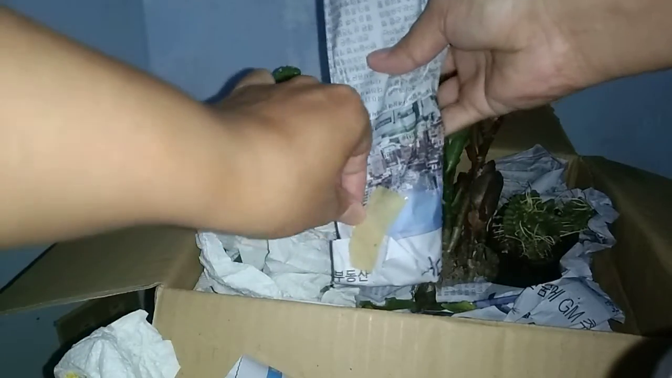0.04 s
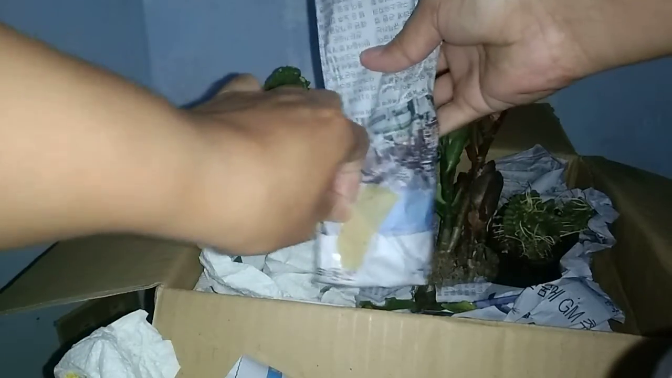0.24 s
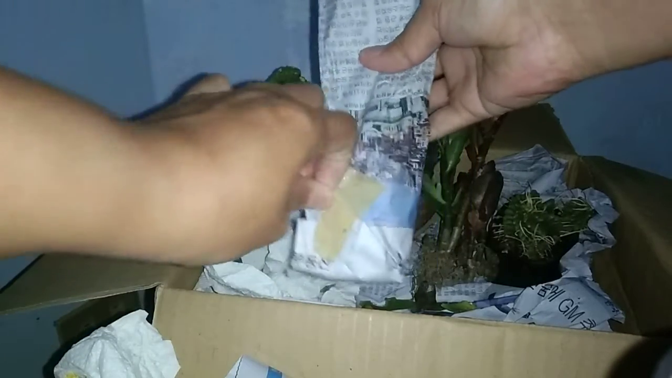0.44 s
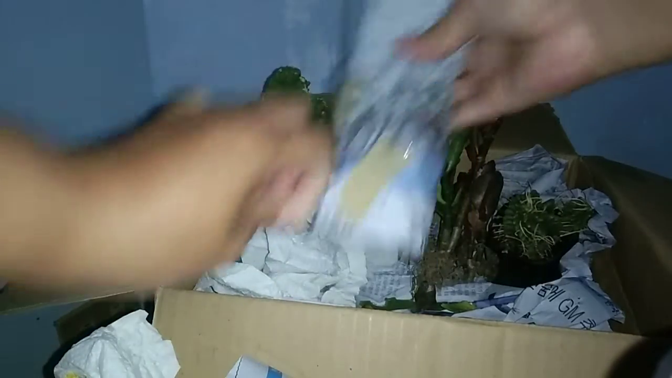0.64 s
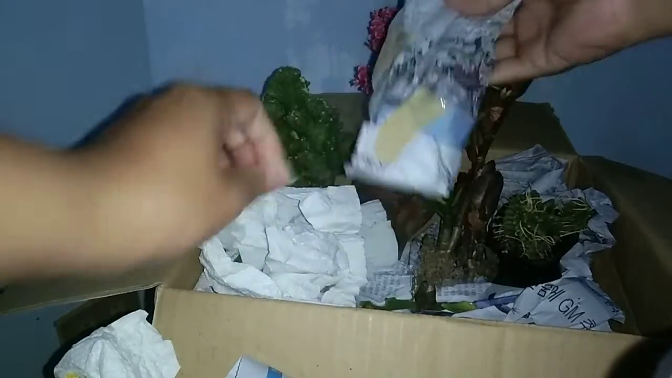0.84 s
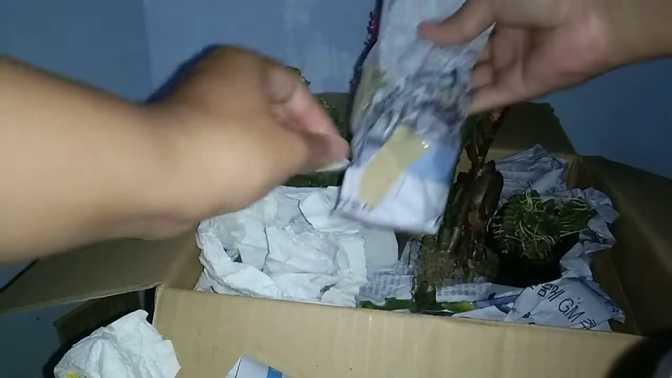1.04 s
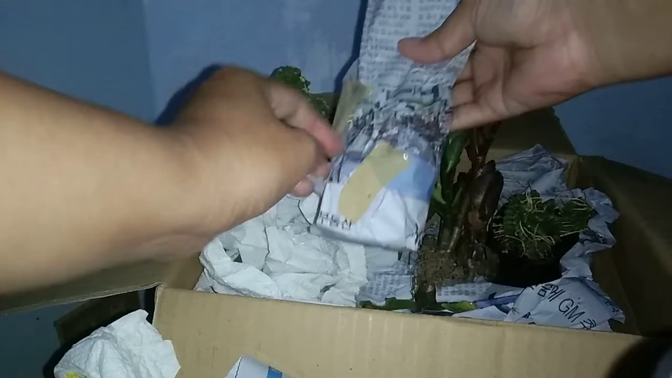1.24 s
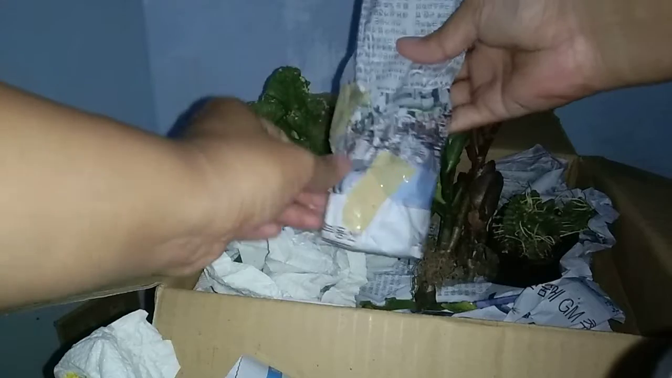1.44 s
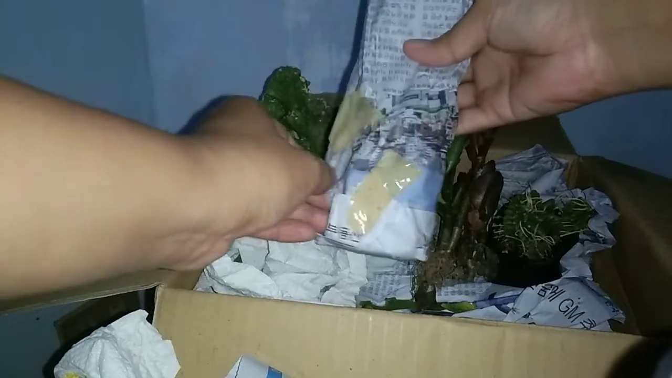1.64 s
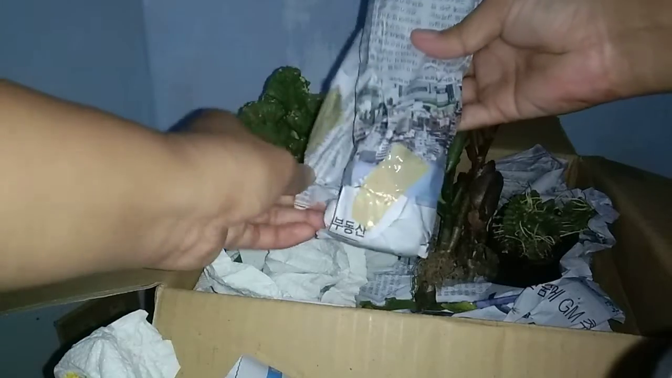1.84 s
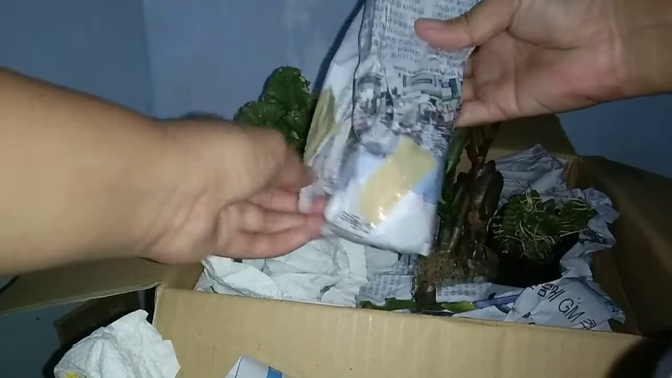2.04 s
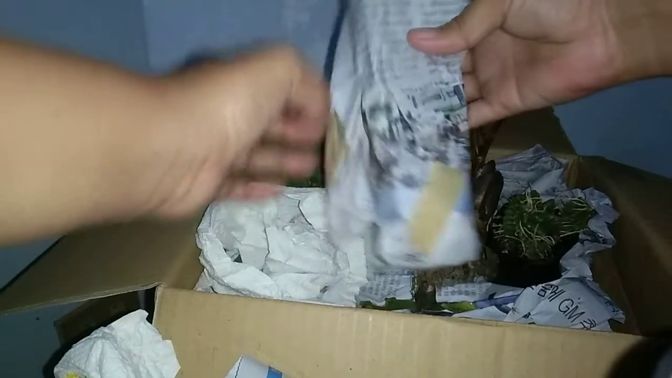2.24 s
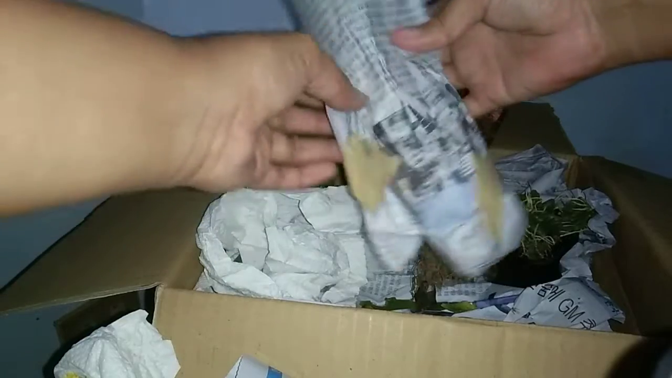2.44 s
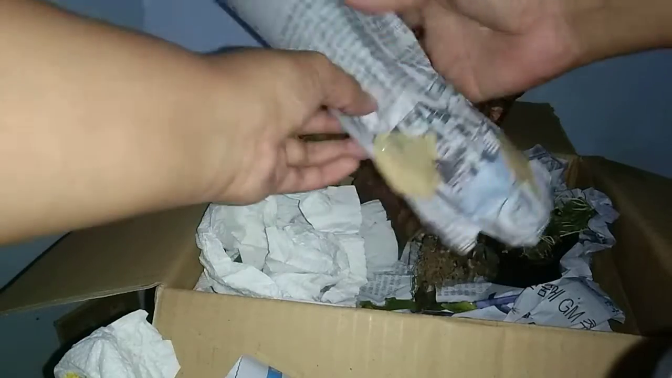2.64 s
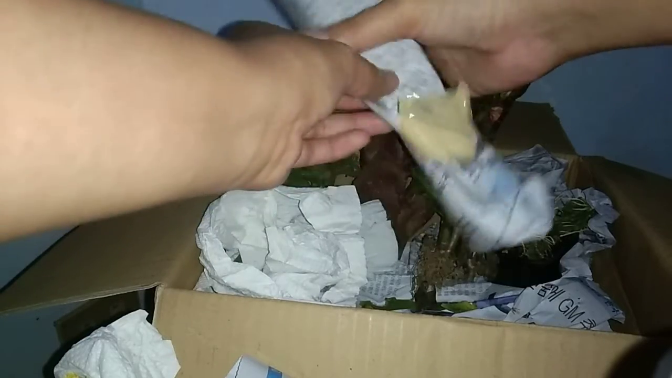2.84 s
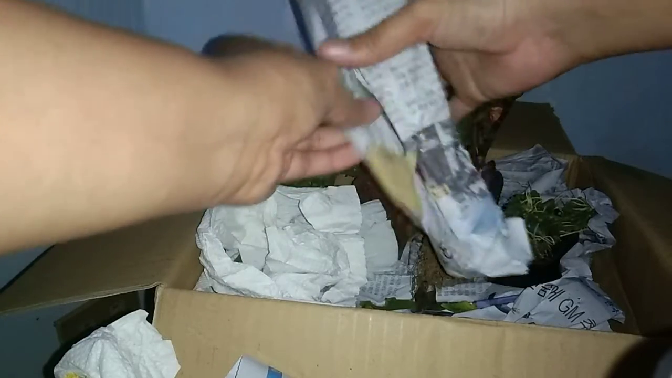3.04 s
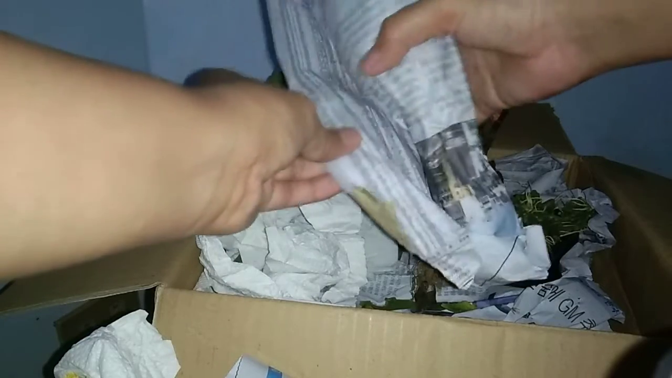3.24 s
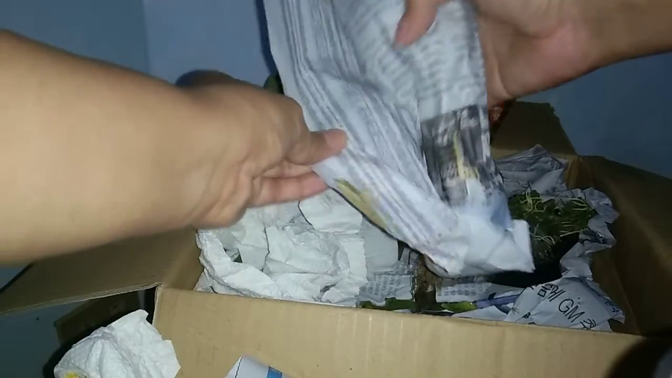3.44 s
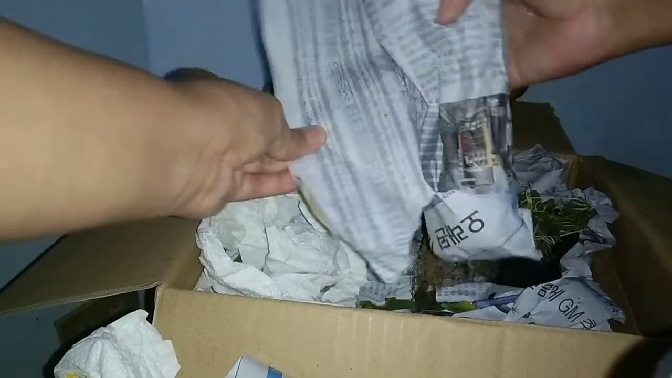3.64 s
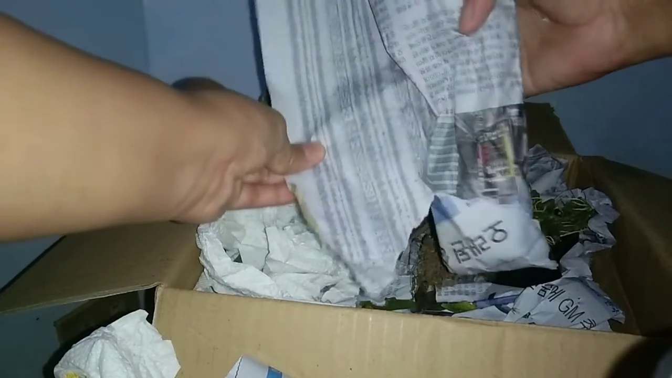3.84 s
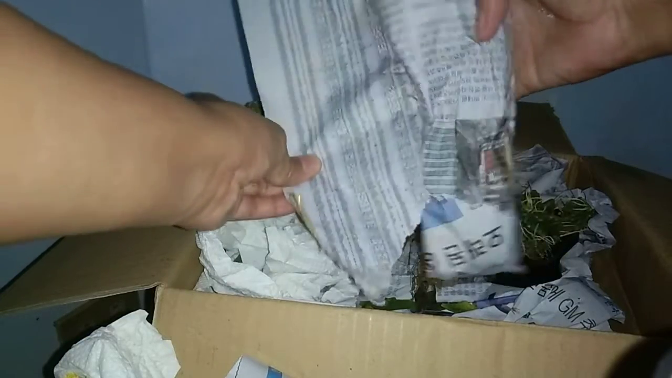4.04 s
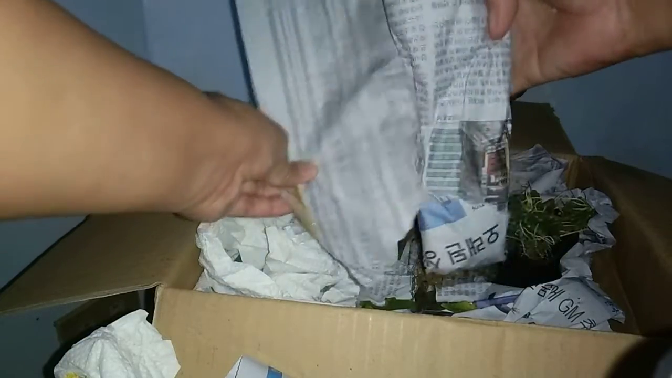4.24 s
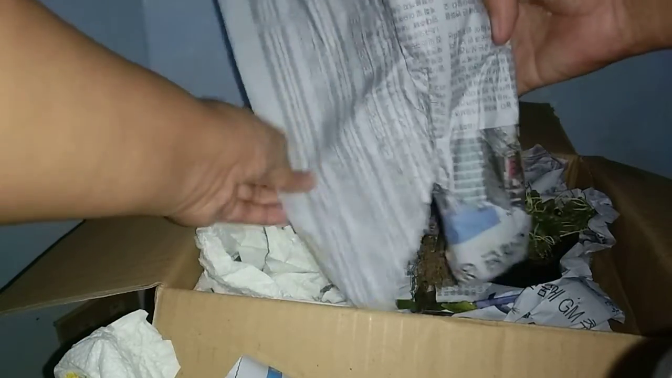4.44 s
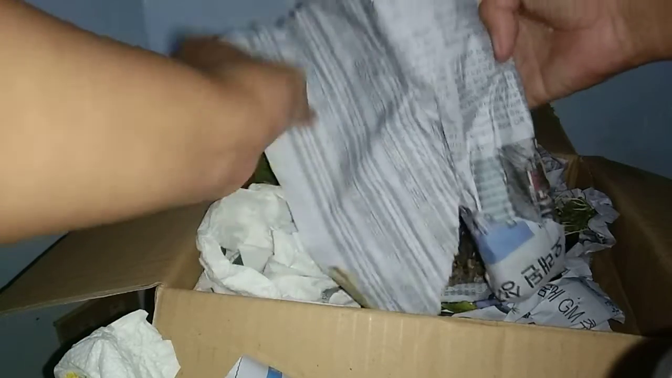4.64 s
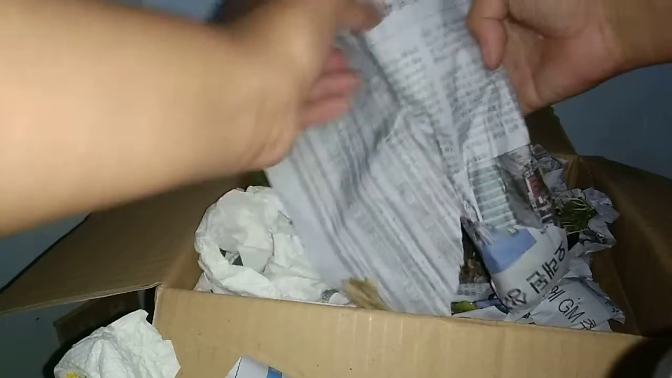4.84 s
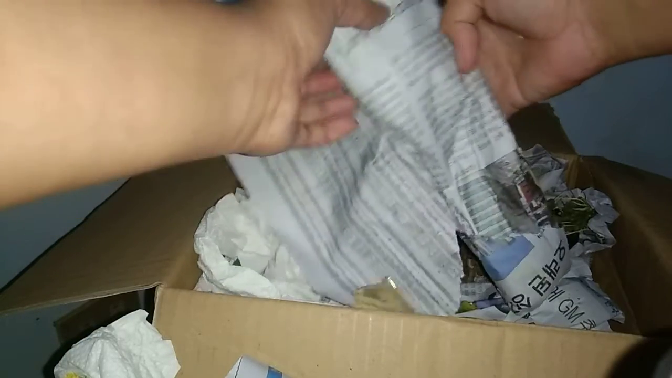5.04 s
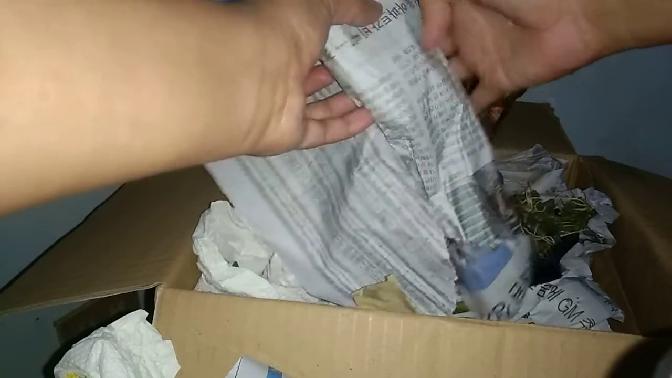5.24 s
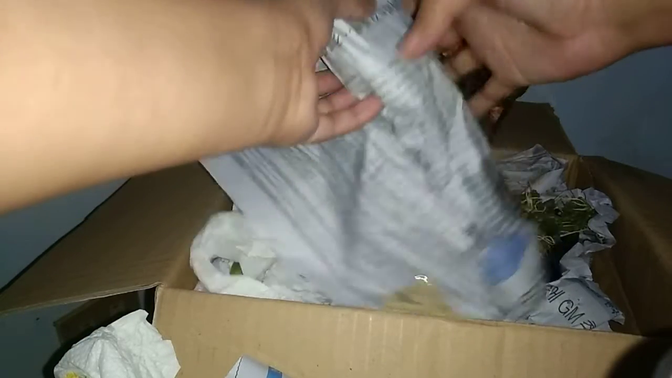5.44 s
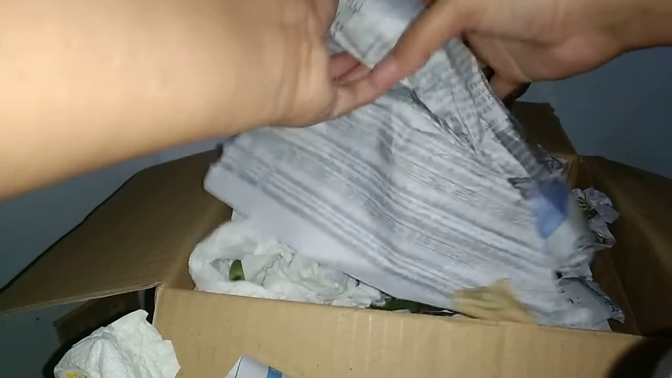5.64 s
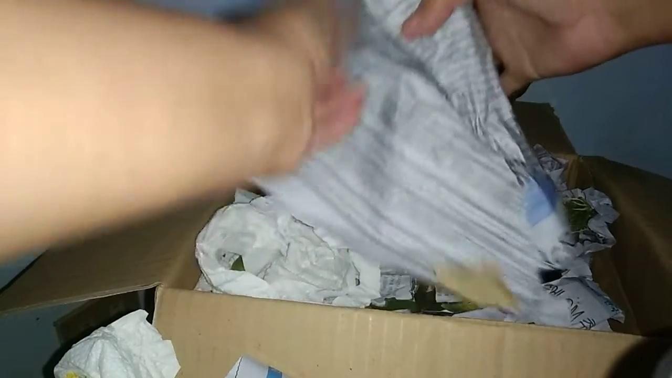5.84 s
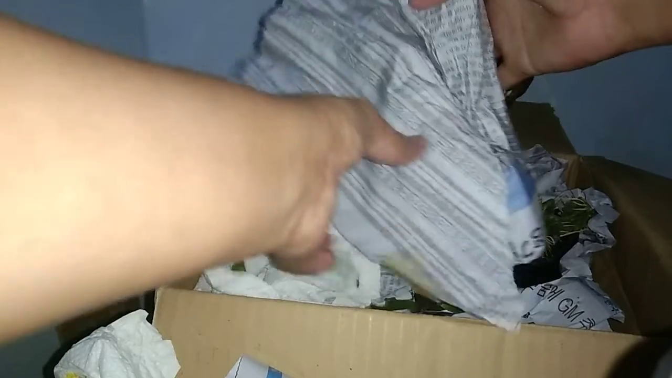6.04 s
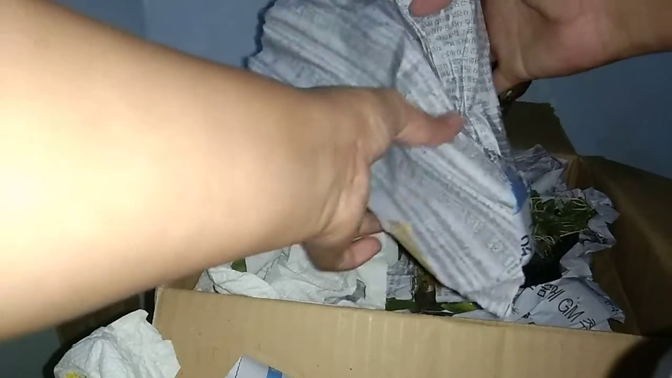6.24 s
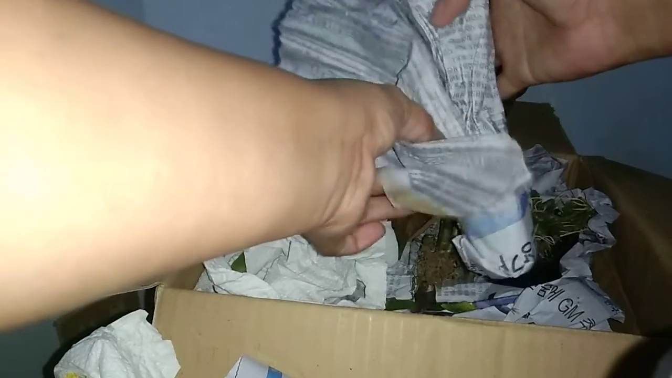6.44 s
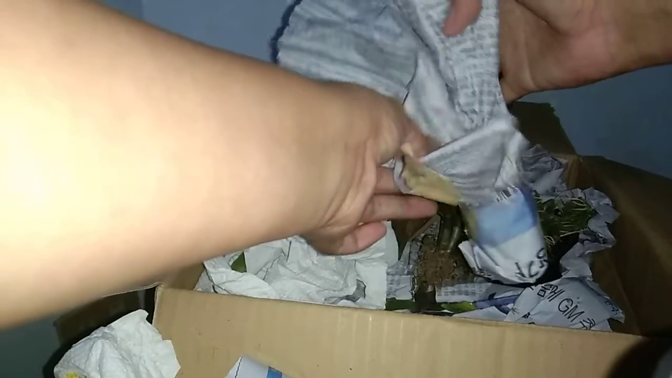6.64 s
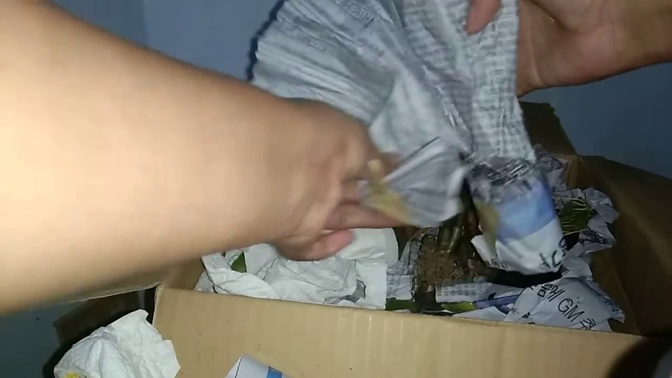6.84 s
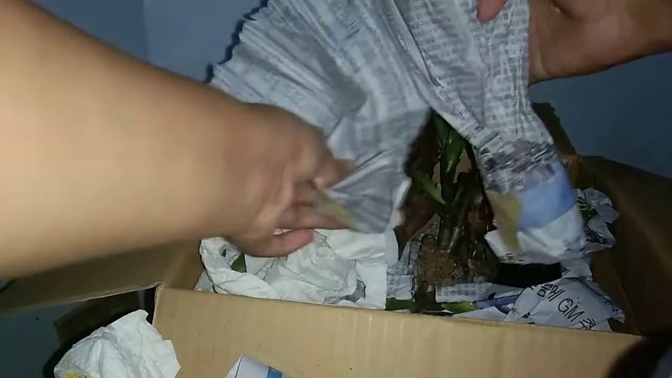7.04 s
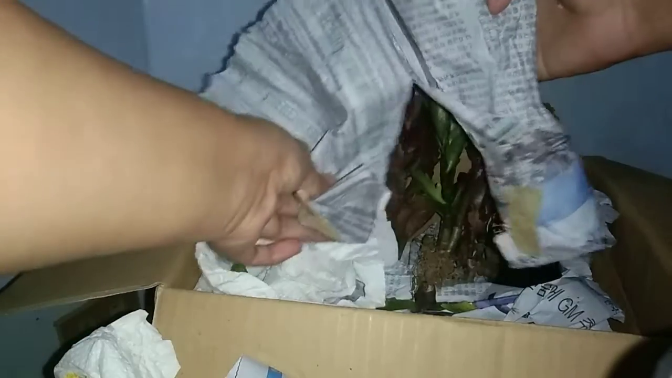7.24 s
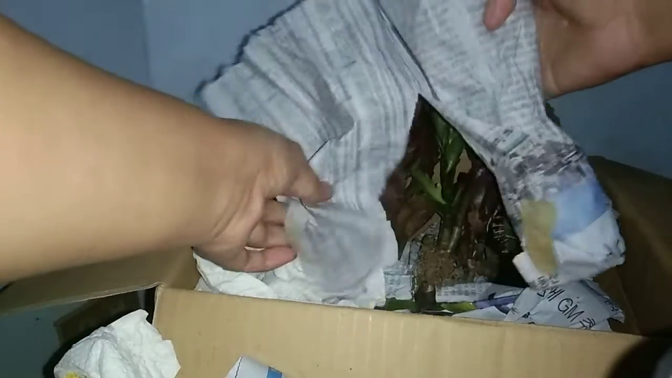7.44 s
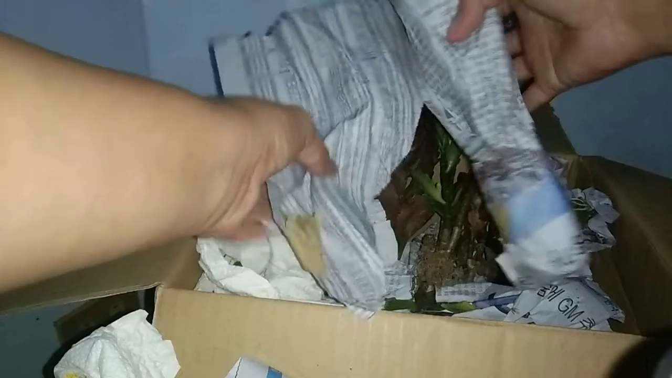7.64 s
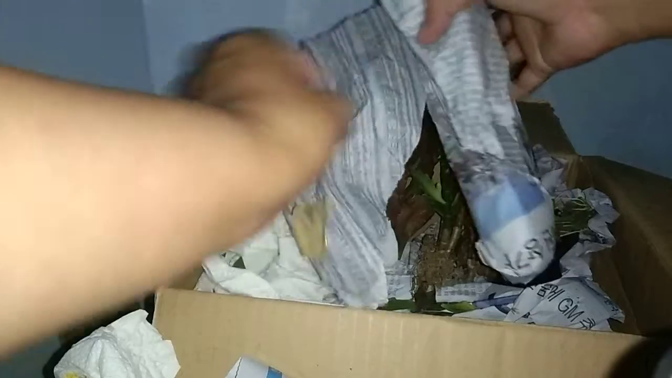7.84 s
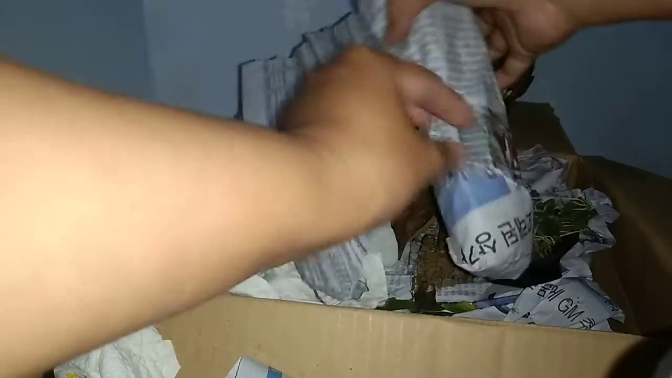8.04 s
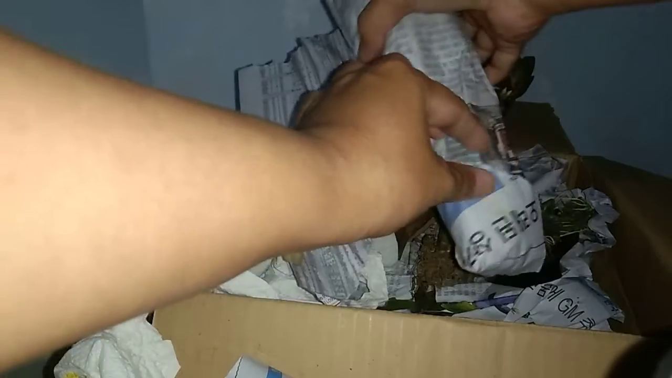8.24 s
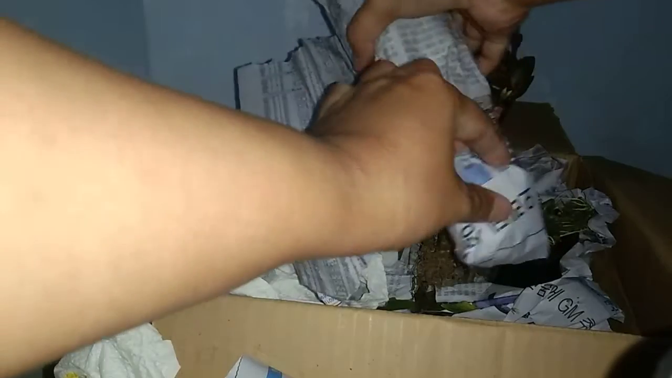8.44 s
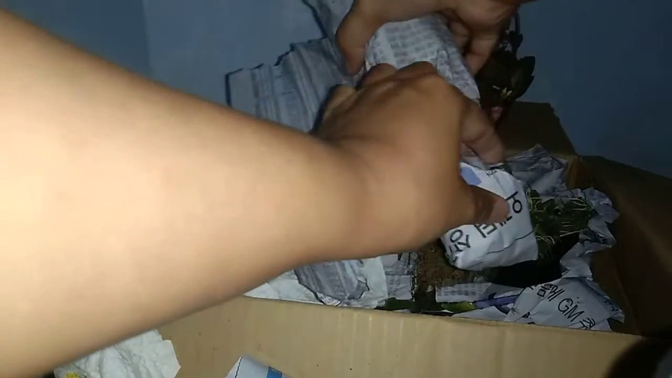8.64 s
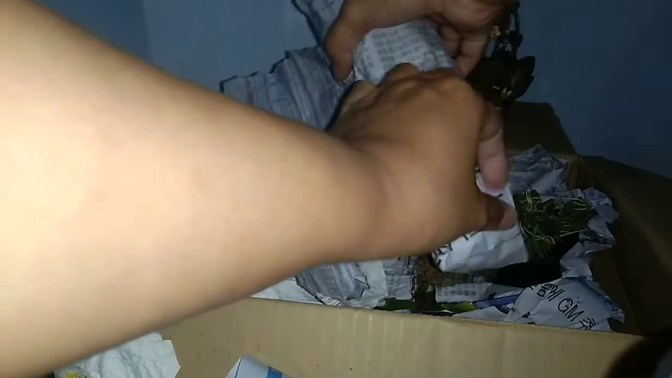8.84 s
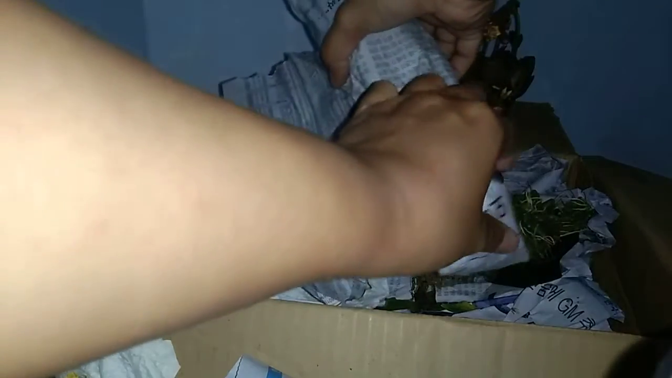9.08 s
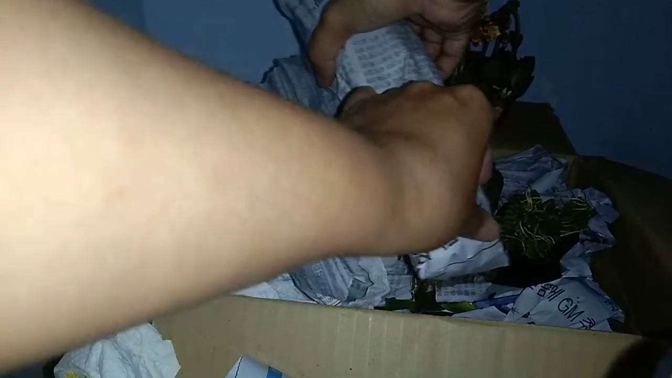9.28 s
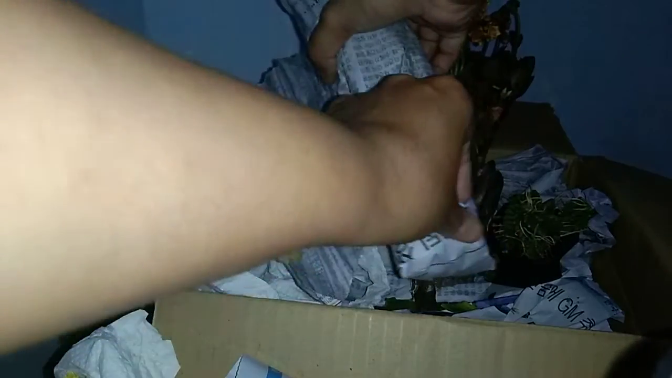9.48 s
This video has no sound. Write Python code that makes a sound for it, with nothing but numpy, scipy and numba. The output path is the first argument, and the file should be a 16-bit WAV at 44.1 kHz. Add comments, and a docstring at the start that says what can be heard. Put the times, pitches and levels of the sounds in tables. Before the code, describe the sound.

Newspaper crinkles, snaps and flaps in uneven bursts as it is pulled off a plant, with faint insects and hum behind.

```python
"""In a room, close to a phone, hands pick at tape, rip it and unwrap newspaper from a plant over a
cardboard box. Creases snap and fingers rub, ringing the sheet's resonances; the paper flaps as it is
tugged and knocks hollowly as it buckles. Insects, room hum and a low thrum lie underneath.
The phone's noise suppressor ducks the bands that do not rise over the insects and the hum."""
import sys
import numpy as np
from scipy import signal
from scipy.fft import rfft, irfft
from scipy.io import wavfile
from scipy.ndimage import uniform_filter1d, map_coordinates
from numba import njit

SR = 44100
rng = np.random.default_rng(int(sys.argv[2]) if len(sys.argv) > 2 else 0)


def dump(signal):
    """Clip the signal to [-1, 1] and save it as 16-bit WAV at the path in sys.argv[1]."""
    limited = np.clip(np.atleast_2d(signal).T, -1, 1)
    pcm = np.round(limited * 32767).astype(np.int16)
    wavfile.write(sys.argv[1], SR, pcm)


N = 419391
FRAME = 512  # samples per suppressor frame: bands 86 Hz apart


def undb(db):
    return 10 ** (np.asarray(db) / 20)


def resonance(hz, width_hz):
    """Two-pole band-pass."""
    edges = [max(hz - width_hz / 2, 20), min(hz + width_hz / 2, .45 * SR)]
    return signal.butter(1, edges, "bandpass", fs=SR, output="sos")


def walk(rate):
    """Glides to a new random value every 1 / rate s; spread near 1."""
    hold = int(SR / rate)
    return uniform_filter1d(np.repeat(rng.standard_normal(N // hold + 1), hold), hold)[:N]


@njit
def pings(count, at, pole, size, steps):
    """Damped sines, each struck at its own sample and left to ring for `steps` samples."""
    out = np.zeros(count)
    for k in range(len(at)):
        z = size[k] + 0j
        for i in range(at[k], min(at[k] + steps, count)):
            out[i] += z.imag
            z *= pole[k]
    return out


def background_db(hz):
    """Spectrum of the bed: room hum in the lows, insects near 7 kHz."""
    # steady noise floor: (frequency [Hz], level per 86 Hz band [dB])
    spectrum = [(150, -85), (400, -83), (780, -85), (1100, -91), (5900, -92), (6300, -82), (6900, -75),
                (7200, -77), (7600, -88), (8400, -87), (11000, -98), (16000, -106)]
    band_hz, db = np.transpose(spectrum)
    return np.interp(np.log(np.maximum(hz, 1)), np.log(band_hz), db)


def background():
    """Insects and room hum: a steady bed of coloured noise."""
    hz = np.arange(N // 2 + 1) * SR / N
    colour = undb(background_db(hz)) * (hz > 130)
    band_gain = np.sqrt(2 * FRAME / 3)  # from level per band to noise amplitude
    return irfft(rfft(rng.standard_normal(N)) * colour, N) * band_gain


def thrum(rest_db=-88.5, slope_db_per_s=141):
    """A wavering low thrum of narrow noise that swells and fades at one pace."""
    # swells of the thrum: (start [s], length [s], level [dB])
    swells = [(0.623, 0.37, -78.5), (1.06, 0.12, -68), (1.461, 0.3, -73), (2.62, 0.18, -76.5),
              (3.242, 0.28, -70.5), (3.617, .2, -69.5), (3.987, 0.14, -70), (4.438, 0.27, -71.5),
              (5.256, 0.28, -78), (5.965, 0.16, -73), (6.897, .1, -80), (7.047, 0.24, -61),
              (7.347, 0.16, -64.5), (7.994, 0.098, -74.5), (9.197, 0.12, -71.5)]
    t = np.arange(0, N, 64) / SR
    start, length, db = np.transpose(swells)[:, :, None]
    outside_s = np.maximum(np.maximum(start - t, t - start - length), 0)
    level_db = np.maximum((db - slope_db_per_s * outside_s).max(axis=0), rest_db)
    sos = resonance(hz=78.7, width_hz=37.0)
    rumble = signal.sosfilt(sos, signal.sosfilt(sos, rng.standard_normal(N)))
    rumble /= np.sqrt(np.mean(rumble ** 2))
    return rumble * undb(np.interp(np.arange(N) / SR, t, level_db) + 2.0 * walk(4.5))


def hands(attack_s=0.019, rise_db=15, stop_db_per_s=606, flap_stop_db_per_s=289):
    """Crisp, body and flap envelopes in dB: each tug swells, holds and stops over gentle handling."""
    # fingers resting and shifting on the sheet: (time [s], crisp rustle [dB], loose flapping [dB])
    handling = [(0, -65, -91.5), (.6, -61.5, -81), (1.0, -71, -96), (1.7, -68, -99), (2.0, -48, -74),
                (2.3, -62.5, -83), (3.1, -59, -81), (3.25, -49, -58.5), (4.4, -48, -59.5), (4.9, -59, -91),
                (5.5, -49, -64), (6.0, -59.5, -89), (6.649, -61, -69.5), (7.15, -45.5, -51.5),
                (7.55, -61.5, -75), (8.2, -66.5, -95), (9.15, -63.5, -104.5), (9.51, -58, -96)]
    # tugs at tape and sheet:
    # (start [s], length [s], crisp rustle [dB], body [dB re crisp], flapping [dB re crisp])
    tugs = [(0.033, 0.072, -56.5, -14, -15), (0.383, 0.083, -57, -3.5, -20),
            (0.559, 0.069, -55, -1.5, -13.5), (0.693, 0.069, -31.5, -6.5, -19.5),
            (1.308, 0.02, -50, -15.5, -28), (1.477, 0.083, -63, -4.5, -21), (1.552, 0.041, -52.5, -9, -38),
            (1.678, 0.048, -52.5, -12.5, -36), (1.768, 0.084, -40, -6.5, -22),
            (1.893, 0.067, -46.5, -9, -20), (2.029, 0.074, -46.5, -7.5, -14),
            (2.191, 0.025, -50, -10, -19.5), (2.304, 0.023, -62.5, -2.5, -6), (2.53, 0.067, -55.5, -3, -14),
            (2.63, 0.082, -51.5, -4, -22.5), (2.82, 0.35, -48.5, -7.5, -36), (3.62, 0.13, -37.5, -5.5, -7),
            (3.903, 0.08, -40, -8.5, -12), (4.096, 0.1, -46.5, -3.5, -31), (4.31, 0.12, -47, -6, -18),
            (4.401, 0.071, -37, -6.5, -13.5), (4.57, 0.029, -50, -3, -4.5), (4.65, 0.11, -63.5, -3.5, -0.5),
            (4.935, 0.11, -55, -2, -14.5), (5.16, 0.11, -58, 0.5, -24), (5.245, 0.18, -48, -4.5, -19.5),
            (5.403, 0.44, -56, -2, -13.5), (5.906, 0.098, -56, -13, -27.5),
            (6.037, 0.08, -45.5, -11, -22.5), (6.137, 0.16, -54, -13, -16.5),
            (6.348, 0.015, -50.5, 1.5, -13.5), (6.475, .1, -45, -8, -14.5), (6.623, 0.1, -46.5, -9.5, -44),
            (6.727, 0.2, -43.5, -4, -16.5), (6.866, 0.054, -38, -8, -13), (6.959, 0.053, -39, -5.5, -10.5),
            (7.019, 0.022, -32, -6, -12.5), (7.055, 0.022, -34.5, -7, -26), (7.093, 0.03, -38, -2.5, -6),
            (7.145, 0.033, -42, -5, -14), (7.27, 0.13, -42.5, -6.5, -8.5), (7.635, 0.047, -61, -0.5, -8),
            (7.704, 0.17, -56.5, -9, -25), (8.062, 0.15, -60, -11.5, -35), (8.293, 0.093, -54, -3.5, -30),
            (8.438, 0.18, -55, -10.5, -36), (8.498, 0.076, -57, -6, -36), (8.67, 0.12, -56.5, -7, -15),
            (8.805, 0.13, -54, -8.5, -23.5), (8.935, 0.063, -54.5, -10, -20.5),
            (9.239, 0.13, -53.5, -6, -18.5), (9.396, 0.088, -50, -11, -39)]
    t = np.arange(0, N, 64) / SR
    start, length, crisp, body, flap = np.transpose(tugs)[:, :, None]
    swell = -rise_db * np.maximum(1 - (t - start) / attack_s, 0)
    after_s = np.maximum(t - start - length, 0)
    settle = -14 - 157.5 * after_s  # the released sheet settles, fainter and slower
    stop = np.maximum(-stop_db_per_s * after_s, settle)
    times, rustle, loose = np.transpose(handling)
    levels = []
    for tug, steady in ((crisp + stop, rustle),
                        (crisp + body + stop, rustle - 8),
                        (crisp + flap - flap_stop_db_per_s * after_s, loose)):
        power = undb(2 * (tug + swell)).sum(axis=0) + undb(2 * np.interp(t, times, steady))
        levels.append(np.interp(np.arange(N) / SR, t, 10 * np.log10(power)))
    return levels


def ring(mode, at, power, rub, tick_share=0.12, tail_db=-16, facet_db=2, turns_at_1k=4):
    """One resonance of the sheet: each snap is a tick, a faint tail and a ping, over rubbing hiss."""
    hz, width_hz, db, t60 = mode
    hits = np.bincount(at, power, N)[:N]
    tick, tail = (signal.lfilter([1], [1, -np.exp(-2 * np.log(1000) / (decay_s * SR))], hits)
                  for decay_s in (tick_share * t60, t60))
    envelope = np.sqrt(tick + undb(2 * tail_db) * tail + rub)
    sos, noise = resonance(hz, width_hz), rng.standard_normal(N)
    noise_rms = np.std(signal.sosfilt(sos, signal.sosfilt(sos, noise)))
    rustle = signal.sosfilt(sos, envelope * noise) / noise_rms
    # each facet between creases has its own pitch; it fades by 1 / e in some turns, more in the treble
    facet_hz = np.clip(hz + width_hz * rng.uniform(-0.5015, 0.53, len(at)), 60, .4 * SR)
    turns = turns_at_1k * np.sqrt(hz / 1000)
    pole = np.exp((2j * np.pi - 1 / turns) * facet_hz / SR)
    facets = pings(N, at, pole, undb(facet_db) * np.sqrt(power), int(min(4 * turns * SR / hz, 1500)))
    return undb(db) * signal.sosfilt(sos, rustle + facets)


def paper(size_db=5.5, largest_db=13, crackle_db=-6, rub_db=-3.5, colour_db=6.0, jolt_db=3):
    """Big crease snaps, a random crackle of small ones and rubbing, all through the same resonances."""
    # snapping creases: (time [s], crisp level [dB], edge [dB re crisp], body [dB re crisp])
    snaps = [(0.146, -41, -6, -23), (0.169, -28.5, 2.5, -13), (0.204, -36, -1, -19),
             (0.2468, -32, -0.5, -24), (0.4075, -36, -3, -2.5), (0.418, -41.5, 15, -10),
             (0.437, -43, -5, 0), (0.449, -49, 15, -30), (0.5, -56.5, 18.5, -34), (0.553, -33.5, -1.5, -13),
             (0.6725, -51.5, 15, -24), (0.689, -40, -5, 2), (1.328, -46, -2, -16.5),
             (1.5905, -41, -14, 4.5), (1.6653, -35, 1, -11.5), (1.79, -22, -12, -12), (1.905, -36, -1, -1),
             (1.931, -29, -2, -11), (1.954, -46, -2, 2), (1.9695, -37, 5, 0.5), (2.021, -35.5, -3, 0),
             (2.061, -31, -9, -15), (2.102, -31, -10, -12), (2.118, -38, 5, -7), (2.411, -43, -5, -9),
             (2.541, -43, 7, -8.5), (2.833, -42, -4, 0.5), (3.0175, -30.5, -5, -16),
             (3.1581, -30.5, 0, -13), (3.18, -33.5, -8, -7), (3.226, -34.5, -3, 5.5),
             (3.2416, -27, 1.5, -8), (3.293, -40, -4, -14), (3.3405, -28, -10, -2),
             (3.3974, -44.5, -18, 12.5), (3.5288, -17.5, -5.5, -18.5), (3.6164, -25, -5, -12),
             (3.633, -24, -4, -25), (3.6939, -22, -1.5, -6), (3.7479, -29, 4.5, -6), (3.8015, -28, -2, -13),
             (3.85, -33, 3.5, -13), (3.9606, -20.5, -1.5, -1), (4.292, -38, 14, 2), (4.3095, -22, -9, -2),
             (4.3327, -27, 1.5, -18), (4.3931, -26, -3, -8.5), (4.4415, -18, -10, -7), (4.682, -37, -9, -6),
             (4.722, -49.5, -10, 11), (4.795, -43.5, 1, -4.5), (4.882, -39.5, -4.5, -3),
             (5.0926, -38, -10, -17), (5.6506, -30, -27, -25), (5.8048, -33, -5.5, -8),
             (6.2283, -27.5, 1.5, -8), (6.314, -31.5, -23, -7.5), (6.356, -43.5, -12, 2.5),
             (6.747, -42.5, 11, 4.5), (6.788, -38.5, 10, 3.5), (6.8185, -29.5, 7.5, -2),
             (6.8736, -17.5, -2, -18), (6.888, -37, 13, -13), (6.907, -28.5, 10.5, -1.5),
             (6.9804, -35.5, 9, -22), (7.025, -30, 8.5, 3), (7.2298, -31, 4, -7.5),
             (7.2766, -39.5, -3, 12.5), (7.293, -22, 4.5, -5), (7.3141, -28, -1, -4), (7.3502, -32, 2, -1),
             (7.3692, -27.5, -1, -3), (7.3928, -26.5, 3, -5.5), (7.4654, -31.5, -4, -6.5),
             (8.0935, -37.5, -20, 5), (8.287, -42.5, -10, -12), (8.7996, -32, -7, -7),
             (9.216, -28, -6.5, -10.5), (9.288, -39.5, -13, -9.5), (9.356, -32.5, -6, -13),
             (9.411, -36, -23, -7)]
    # the sheet's resonances, low to high: (centre [Hz], width [Hz], gain [dB], burst t60 [s])
    flap_modes = [(152, 120, -21.5, 0.2), (267.2, 132, -5.5, 0.13), (461.5, 230, -3.5, 0.12)]
    body_modes = [(767, 240, -17.5, 0.072), (1154, 603, -6, 0.047), (2004, 1020, -2.5, 0.057)]
    crisp_modes = [(4297, 3100, -8.5, 0.084), (5590, 1560, -12.5, 0.095)]
    edge_modes = [(8330, 1780, -3.5, 0.091), (9900, 3300, -14, 0.064), (14200, 4000, -26.5, 0.011)]
    crisp, body, flap = hands()
    times, snap_crisp, snap_edge, snap_body = np.transpose(snaps)
    large_at, small_at = (times * SR).astype(int), rng.integers(0, N, 3000)
    size = size_db * rng.exponential(size=len(small_at))  # most creases are tiny, a few are larger
    grip_db = 2 * walk(25)  # the grip slips and catches
    tilt = 1.5 * np.clip(rng.standard_normal(len(small_at)), -2, 2)  # dB per octave: dull or bright
    jolt = flap[large_at] + jolt_db  # a big snap jolts the sheet as far as it is flapping
    out = 0
    for modes, hand, snap in ((flap_modes, flap, jolt),
                              (body_modes, body, snap_crisp + snap_body),
                              (crisp_modes, crisp, snap_crisp),
                              (edge_modes, crisp, snap_crisp + snap_edge)):
        drive = hand + grip_db
        for mode in modes:
            # every crease has its own colour
            tint = colour_db * np.clip(rng.standard_normal(len(small_at)), -3, 1.5)
            tint += tilt * np.log2(max(mode[0], 1500) / 3500)
            crackle = drive[small_at] + crackle_db + np.minimum(size + tint, largest_db)
            power = undb(2 * np.r_[crackle, snap])
            rub = undb(2 * (drive + rub_db + 2.0 * walk(17)))
            out = out + ring(mode, np.r_[small_at, large_at], power, rub)
    return out


def hollow(x, lag_s=0.0011046, drift=0.3017, echo_db=-9.0):
    """The far wall of the rolled sheet sends the sound back; the gap shifts as the hands move."""
    lag = SR * lag_s * np.exp(drift * walk(6))
    return x + undb(echo_db) * map_coordinates(x, [np.arange(N) - lag], mode="nearest")


def room(x, t60_s=0.12, wet_db=-14):
    """Walls and box give back a short, dull tail."""
    t = np.arange(SR // 2) / SR
    fade_in = np.minimum(t / 0.00054, 1)
    tail = rng.standard_normal(len(t)) * np.exp(-np.log(1000) * t / t60_s) * fade_in
    tail = signal.lfilter([1], [1, -.3], tail)
    return undb(wet_db) * signal.fftconvolve(x, tail / np.sqrt(np.sum(tail ** 2)))[:N]


def knocks(turns=2.4):
    """A buckling patch of the sheet pumps air for a few turns, at its pitch and a little above."""
    # hollow knocks: (time [s], strength [dB], pitch [Hz])
    buckles = [(0.58, -53, 446), (2.101, -47, 416), (2.842, -55, 248), (3.225, -42.5, 470),
               (3.397, -40.5, 496), (3.443, -45, 315), (3.526, -44.5, 244), (3.619, -40, 258),
               (3.649, -36, 252), (3.75, -37, 149), (3.819, -40, 200), (3.958, -36, 478), (4.041, -34, 203),
               (4.211, -46.5, 240), (4.457, -36.5, 162), (6.475, -48.5, 275), (6.9, -36.5, 318),
               (6.983, -33, 308), (7.09, -32, 166), (7.166, -34, 170), (7.227, -42, 301), (7.282, -40, 485),
               (7.879, -63.5, 478), (8.483, -57.5, 397)]
    times, strength_db, hz = np.transpose(buckles)
    out = 0
    for ratio, partial_db in ((1, 5.5), (1.45, -1.5)):
        pole = np.exp((2j * np.pi - 1 / turns) * ratio * hz / SR)
        out = out + pings(N, (times * SR).astype(int), pole, undb(strength_db + partial_db), SR // 10)
    return signal.sosfilt(resonance(hz=510.0, width_hz=440.0), out)


def scene():
    """The newspaper up front with its room tail, over the bed and the thrum; mono."""
    sheet = hollow(paper()) + knocks()
    return (sheet + room(sheet) + background() + thrum())[None]


def suppress(x, release_s=0.039, lowest_hz=130, margin_db=5.5, knee_db=.6, depth_db=-18):
    """Multiband gate: bands near the background duck; they open at once on a jump and close slowly."""
    framing = dict(fs=SR, nperseg=FRAME, noverlap=3 * FRAME // 4)
    hz, _, bands = signal.stft(x, **framing)
    gate_db = background_db(hz)[:, None] + margin_db
    power = uniform_filter1d(np.abs(bands) ** 2, size=3, axis=0)
    # the meter saturates, so a loud sound holds its band open no longer than a middling one
    power = np.minimum(power, undb(2 * (gate_db + 8.0)))
    memory = np.exp(-FRAME / 4 / SR / release_s)
    for i in range(1, power.shape[1]):
        jump = power[:, i] > 5 * power[:, i - 1]
        smoothed = memory * power[:, i - 1] + (1 - memory) * power[:, i]
        power[:, i] = np.where(jump, power[:, i], smoothed)
    over_db = 10 * np.log10(power + 1e-18) - gate_db
    shut = 1 / (1 + np.exp(np.clip(over_db / knee_db, -30, 30))) * (hz > lowest_hz)[:, None]
    gain = undb(depth_db * uniform_filter1d(shut, size=5, axis=1))
    return signal.istft(bands * gain, **framing)[1][:N]


def record(dry):
    """The phone suppresses steady noise and cuts the top above 15.7 kHz."""
    top_cut = signal.ellip(10, .2, 80, 15700, fs=SR, output="sos")
    return signal.sosfilt(top_cut, suppress(dry[0]))[None]


dry = scene()
out = record(dry)
dump(out)
```